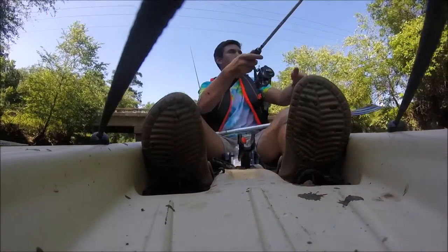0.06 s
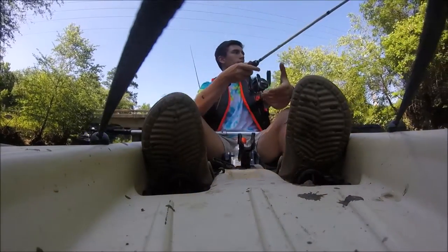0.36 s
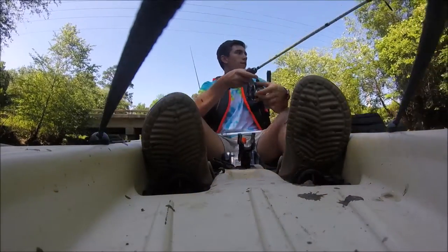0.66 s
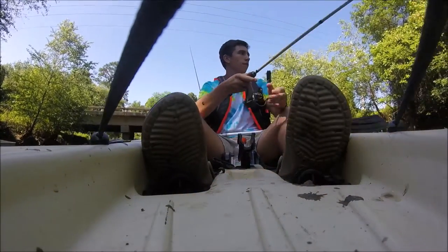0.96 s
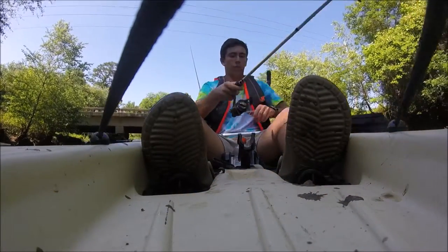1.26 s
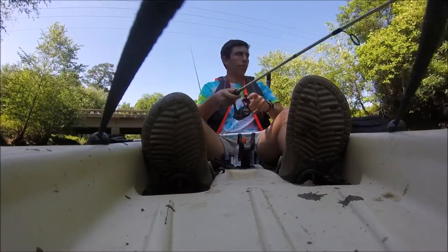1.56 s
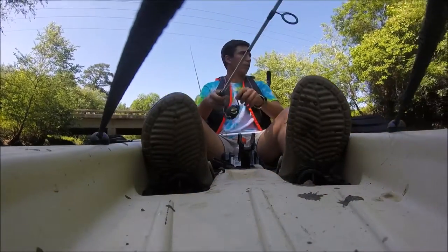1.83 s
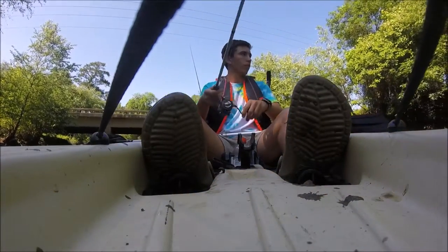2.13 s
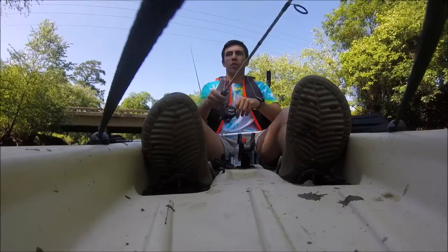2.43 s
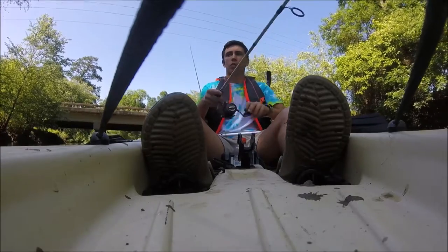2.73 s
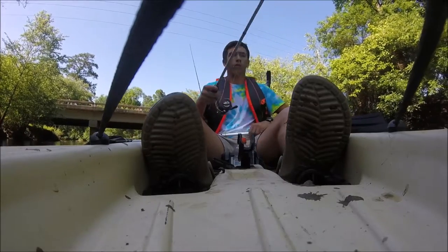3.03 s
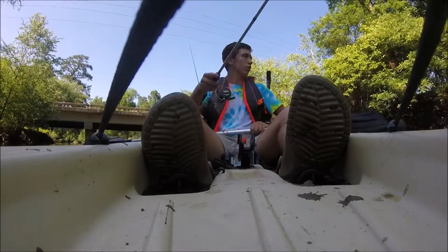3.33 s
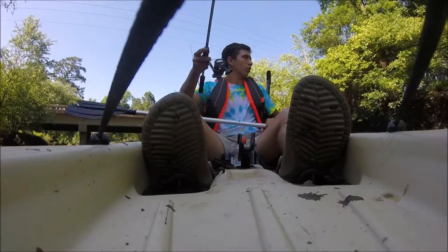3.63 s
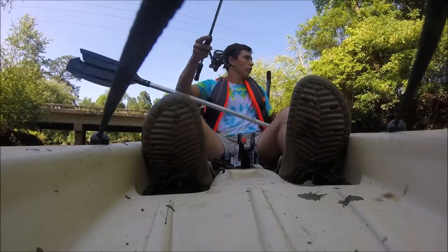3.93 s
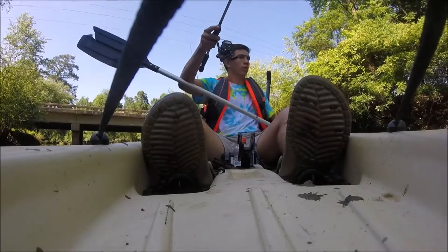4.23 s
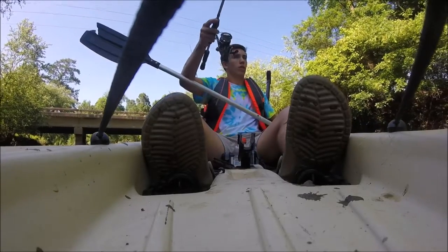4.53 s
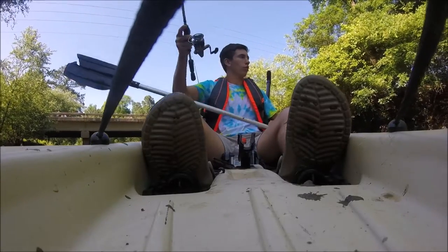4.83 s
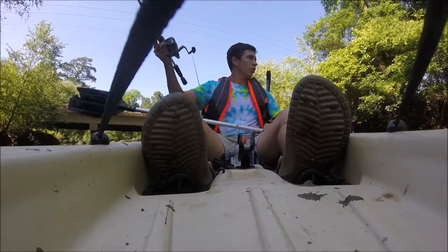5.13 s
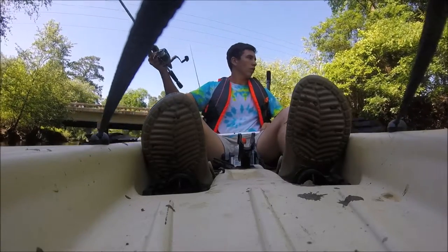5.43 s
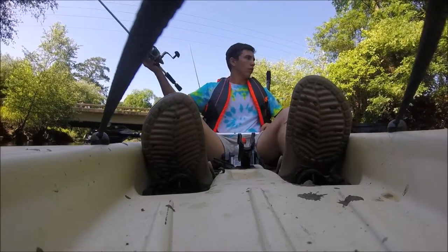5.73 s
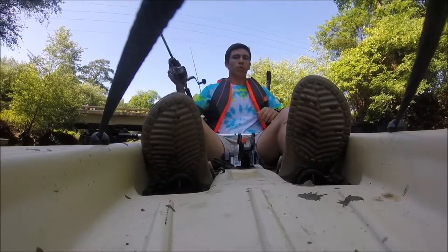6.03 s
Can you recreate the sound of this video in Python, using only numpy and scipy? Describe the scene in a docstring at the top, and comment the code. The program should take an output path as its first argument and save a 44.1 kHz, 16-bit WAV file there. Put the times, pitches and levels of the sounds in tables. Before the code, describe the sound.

A fishing rod and paddle bump a hollow plastic kayak close by, while a reel clicks and distant vehicles softly rumble.

```python
"""Rod butt and paddle knock on the hollow hull of a plastic kayak as an angler shifts about, close by.
Each blow cracks where it lands and sets the hull ringing. The metal parts of his spinning reel click,
and the line hisses as it rubs through the rod rings. A far bird whistles two songs of sliding notes.
Two vehicles rumble over a road bridge behind him, above the soft hiss of creek and leaves."""
import sys
import numpy as np
from scipy import signal
from scipy.fft import rfft, irfft, next_fast_len
from scipy.io import wavfile
from scipy.ndimage import map_coordinates

SR = 44100
rng = np.random.default_rng(int(sys.argv[2]) if len(sys.argv) > 2 else 0)


def log_audio(samples):
    """Write samples as a 16-bit WAV file to the path given in sys.argv[1]."""
    # one column per channel
    frames = np.atleast_2d(samples).T
    # limit to full scale, then quantise
    limited = np.clip(frames, -1, 1)
    pcm = np.round(limited * 32767).astype(np.int16)
    wavfile.write(sys.argv[1], SR, pcm)


N = 272097
TIME = np.arange(N) / SR


def kayak_knocks():
    """Blows on the hull: harder ones add bass and crack, and a stiff spot trades bass for treble."""
    # blows (time [s], level [dB], panel pitch [Hz], damping by what stays pressed on the panel [dB/s])
    blows = [(0.744, -23.5, 610, 20), (1.349, -26, 640, 28), (1.726, -28, 604, 25), (2.073, -35.5, 497, 20),
             (3.017, -42, 555, 18), (3.311, -42, 443, 102), (3.881, -36.5, 476, 1400),
             (3.989, -41.5, 490, 900), (4.074, -13, 529, -2), (4.156, -23.5, 504, 6),
             (5.16, -22.5, 493, 48), (5.259, -32.5, 502, 96), (5.532, -16.5, 631.5, 34),
             (5.589, -30.5, 526, 202), (5.659, -34.5, 623, 58), (5.889, -22, 502, 7),
             (5.968, -26.5, 492, 26), (6.045, -40, 493, 47)]
    firm_db, slack_hz = -25, 527  # an ordinary firm blow; a panel pitched above slack_hz is stiffer
    heave_colour = [(20, -13), (45, -3.5), (70, -13), (130, -16.5), (400, -78)]  # (pitch [Hz], level [dB])
    out, t = np.zeros(N), np.arange(int(.7 * SR)) / SR
    for start, db, panel_hz, damping in blows:
        hull = struck_hull(t, panel_hz) * amp(-abs(damping) * t)
        force_db = db - firm_db
        stiff_db = 15 * np.log2(panel_hz / slack_hz)
        thump_db = -14 + 0.05 * force_db - stiff_db - 0.017 * damping
        crack_db = -31.5 + 0.23 * force_db
        tick_db = -46 + 0.11 * force_db + stiff_db
        parts = [(band(hull, 200, "low"), thump_db), (band(hull, [220, 1200], "band"), -9),
                 (band(hull, [1300, 3200], "band"), crack_db), (band(hull, 3600, "high"), tick_db)]
        add(out, start, sum(amp(db + part_db) * even_start(part) for part, part_db in parts))
        # the boat heaves on the water, heard only after the heaviest blows
        heave = noise(heave_colour, len(t)) * fade(t, 0.61) * (1 - np.exp(-t / 0.013))
        add(out, start, amp(-61.5 + 2.72 * (force_db - stiff_db)) * heave)
    return out


def struck_hull(t, panel_hz):
    """One blow cracks at the contact, sends a bending wave round the hull and leaves it ringing."""
    # the first bending wave and its echoes from the hull's sides (delay [s], level [dB])
    echoes = [(0, 2.5), (.0043, -2), (0.015, -2.5), (0.029, -35)]
    # the hull's ringing tones (pitch [Hz], level [dB], time to fade by 60 dB [s])
    hull_tones = [(47.73, -20, 1), (101.1, -13.5, 0.59), (148.6, -6, 0.26), (177, -10.5, 0.37),
                  (198.8, -10.5, 0.51), (223.8, -10.5, 0.29), (271, -24, 0.34), (320.6, -3.5, 0.1),
                  (376.4, 0, 0.1), (433, -15, 0.23), (476, 1, 0.041), (534.7, -10, 0.44), (612, 9, 0.057),
                  (665, -4.5, 0.095), (751.4, -4.5, 0.16), (922, -17, 0.28), (982, -18, 0.16),
                  (1170, -9.5, 0.072), (1460, -36, 0.021), (1854, 0, 0.073), (1897, -0.5, 0.038),
                  (2770, -1, 0.048)]
    # the crack at the contact (pitch [Hz], level [dB])
    crack_colour = [(900, -12.5), (2000, 6.5), (2800, -4), (3500, -8), (6000, -16), (10000, -37.5),
                    (15000, -43)]
    arrivals = [(np.maximum(t - delay, 0), db) for delay, db in echoes]
    wave = sum(amp(db) * np.sin(2 * np.pi * 470 * age) * fade(age, 0.009) for age, db in arrivals)
    tones = even_start(ring(hull_tones, t, scatter_db=1.5))
    body = (amp(-2) * tones + amp(-5.5) * plastic_shell(t)) * (1 - np.exp(-t / 0.002))
    panel = np.sin(2 * np.pi * panel_hz * t) * fade(t, 0.086) * (1 - np.exp(-t / 0.0088))
    # the contact firms up for a few milliseconds, then lets go
    press = np.exp(-((t - .003) / 0.0021) ** 2)
    release = amp(-1) * fade(t, 0.042) * (1 - np.exp(-t / 0.0013))
    crack = noise(crack_colour, len(t)) * (press + release)
    return body + amp(7.5) * panel + amp(-2.5) * even_start(wave) + crack


def plastic_shell(t):
    """The hull's countless weak tones blur into noise that lasts longest near 150 Hz."""
    # the colour of the weak tones (pitch [Hz], level [dB])
    colour = [(30, -18), (90, -11.5), (200, -3.5), (300, 2.5), (500, 1), (740, 2.5), (1050, -16),
              (2000, -9), (3200, -16.5), (6000, -25.5), (15000, -53)]
    # how long they ring (pitch [Hz], time to fade by 60 dB [s])
    ring_times = [(60, 0.18), (150, 0.57), (300, 0.38), (600, 0.22), (1200, 0.23), (3000, 0.27),
                  (10000, 0.43)]
    hz, age, spectrum = signal.stft(noise(colour, len(t)), SR, nperseg=512)
    fading = spectrum * fade(age, along(ring_times, hz)[:, None])
    return even_start(signal.istft(fading, SR, nperseg=512)[1][:len(t)])


def reel_clicks():
    """Small metal parts snap shut, ping the reel's body and shake the bail, its wire arm."""
    # snaps of bail and reel (time [s], level [dB], boost of the low part [dB], ping pitch [Hz])
    clicks = [(0.9645, -33, -5.5, 2127), (0.9804, -50.5, 2, 2000), (2.269, -54.5, -7, 4260),
              (2.289, -52.5, -6, 4530), (2.8394, -57, 0.5, 2340), (2.9294, -39.5, -20, 3720),
              (3.8796, -51.5, -14, 2100), (6.0703, -52.5, 1.5, 2640)]
    # the bail's ringing tones (pitch [Hz], level [dB], time to fade by 60 dB [s])
    bail_tones = [(1550, -24, 0.45), (2000, -7, 0.24), (3730, -19, 0.073), (4510, 12, 0.057),
                  (4580, -29, 0.19), (5900, -9, .08), (6250, 2, 0.13), (8370, 20, 0.021),
                  (8200, -24, 0.045), (12200, -1, .03)]
    # the colour of a snap (pitch [Hz], level [dB])
    snap_colour = [(1000, -2.5), (2100, -2), (2900, -3), (3600, -3), (5200, -0.5), (7000, -2), (9000, -3.5),
                   (10800, -18.5), (12600, -18), (15000, -22)]
    out, t = np.zeros(N), np.arange(SR // 4) / SR
    winding_ticks = [(start, -61.5, 4, 2170) for start in rng.uniform(1.5, 4.2, size=6)]
    for start, db, low_db, ping_hz in clicks + winding_ticks:
        wire = ring(bail_tones, t, scatter_db=2.5)
        ping = np.sin(2 * np.pi * ping_hz * t) * fade(t, .07)
        snap = noise(snap_colour, len(t)) * (fade(t, 0.018) + amp(-30) * fade(t, 0.14))
        onset = 1 - np.exp(-(t / .002) ** 2)
        click = (even_start(snap) + amp(-12) * even_start(wire) + amp(-10.5) * even_start(ping)) * onset
        add(out, start, amp(db - 15) * even_start(band(click, 2700, "high")))
        add(out, start, amp(db + low_db - 7) * even_start(band(click, 2700, "low")))
        # the harder the snap, the sharper its edge
        edge = band(snap * fade(t, .025) * onset, 11000, "high")
        add(out, start, amp(2.2 * db + 9) * even_start(edge))
    return out


def fishing_line():
    """Line rubs through the rings: a hiss roughened by tiny slips, fluttering as the coils pass."""
    # short runs of line (start [s], length [s], level [dB])
    runs = [(-.15, 0.41, -63.5), (0.188, 0.53, -82), (2.258, 0.18, -68), (2.426, 0.29, -68.5),
            (5.147, 0.24, -71.5)]
    # the colour of the rubbing (pitch [Hz], level [dB])
    colour = [(3000, -27), (4500, -10), (6000, 8), (7400, -5), (8800, -3), (10500, -8), (12500, -6),
              (15000, -14)]
    running = sum(amp(db) * np.sin(np.pi * np.clip((TIME - start) / length, 0, 1))
                  for start, length, db in runs)
    slips, t = np.zeros(N), TIME[:SR // 40]
    for start, hz, size in rng.uniform([0, 4500, 0], [N / SR, 13500, 1], (6000, 3)):
        slip = np.sin(2 * np.pi * hz * t) * fade(t, .012)
        add(slips, start, size ** 2 * amp(along(colour, hz)) * slip)
    coils = amp(3 * wobble(130))
    return amp(-4.5) * running * unit(coils * (noise(colour, N) + unit(slips)))


def bird():
    """Each phrase is a low rising note, then a high one sliding down; the trees scatter their echoes."""
    # the rising note in even steps (pitch [share of the top pitch], level [dB])
    rising = [(.475, -6), (.505, 0), (.53, -1), (.56, -5)]
    # the falling note in even steps (pitch [share of the top pitch], level [dB])
    falling = [(.97, -10), (1, 1), (.96, 0), (.88, -3), (.82, -5), (.75, -3), (.69, -5)]
    out, t = np.zeros(N), np.arange(SR // 2) / SR
    for start, db in bird_phrases(count=7):
        top_hz = 3900 * (1 + 0.0121 * rng.standard_normal())
        low_note = amp(2) * whistle(.055, rising, top_hz)
        high_note = whistle(.082, falling, top_hz)
        for when, note in [(start - .072, low_note), (start, high_note)]:
            trees = rng.standard_normal(len(t)) * (fade(t, .05) + amp(-14) * fade(t, .7))
            add(out, when, amp(db - 3) * note)
            add(out, when, amp(db - 6) * signal.fftconvolve(note, trees / np.linalg.norm(trees)))
    return out * amp(2.5 * wobble(70))


def bird_phrases(count):
    """List each phrase (time [s], level [dB]): a song quickens as it swells and falls away."""
    # the two songs, the first already under way (start [s])
    song_starts = [-.738, 4.348]
    # the top of each song's swell (level [dB])
    song_levels = [-66.5, -64]
    loudest_after_s, swell_db_per_s = .93, 8.5
    gaps_s = .2445 - .005 * np.arange(count - 1)
    offsets = np.append(0, np.cumsum(gaps_s))
    return [(start + offset, db - swell_db_per_s * abs(offset - loudest_after_s))
            for start, db in zip(song_starts, song_levels) for offset in offsets]


def whistle(length_s, steps, top_hz):
    """One pure note slides through evenly spaced steps of pitch and level."""
    progress = np.linspace(0, 1, int(length_s * SR))
    share, db = [np.interp(progress, np.linspace(0, 1, len(col)), col) for col in np.transpose(steps)]
    tone = unit(np.sin(2 * np.pi * np.cumsum(top_hz * share) / SR))
    return amp(db) * tone * signal.windows.tukey(len(tone), 1 / 8)


def traffic_and_creek():
    """Exhausts rumble and tyres roar, hiss and whine over steady far traffic, creek and leaves."""
    # vehicles on the bridge (time when nearest [s], rumble [dB], tyre roar [dB], tyre whine [dB])
    vehicles = [(.42, -47, -48.5, -77), (5.75, -54.5, -64.5, -57.5)]
    # the colour of the exhaust rumble (pitch [Hz], level [dB])
    rumble_colour = [(15, -16), (25, -2.5), (38, -4), (52, -3), (70, 2), (100, -6), (150, -8), (220, -13.5),
                     (320, -21), (600, -68)]
    # the colour of tyres on the road (pitch [Hz], level [dB])
    road_colour = [(120, 3), (220, -3.5), (350, 1), (480, 2.5), (650, -1), (800, -8), (1050, -18.5),
                   (1500, -25.5), (2100, -17), (3000, -33), (6000, -54)]
    # the colour of the hiss of creek, leaves and tyres (pitch [Hz], level [dB])
    hiss_colour = [(400, -3), (900, 7.5), (1500, 3.5), (2050, 3), (2700, -1.5), (4000, -4), (6000, -10),
                   (9000, -16), (12000, -21.5), (15000, -31.5)]
    far_rumble_db, far_road_db, creek_db = -56, -59.5, -65.5
    exhaust_lag_s = 0.35  # the exhaust points backwards, so it is loudest after the vehicle has passed
    nearest_s, rumble_db, roar_db, whine_db = np.transpose(vehicles)[:, :, None]
    roar = passing(nearest_s, roar_db, half_power_s=.55)
    exhaust = passing(nearest_s + exhaust_lag_s, rumble_db, half_power_s=1.05)  # rumble carries farther
    flutter = amp(1.3 * wobble(22))
    rumble = np.hypot(amp(far_rumble_db), exhaust) * noise(rumble_colour, N)
    road = np.hypot(amp(far_road_db), roar) * flutter * noise(road_colour, N)
    hiss = np.hypot(amp(creek_db), amp(-18) * roar) * amp(0.16 * wobble(10)) * noise(hiss_colour, N)
    tyre_tone = np.sin(2 * np.pi * np.cumsum(568 + 8 * wobble(40)) / SR)
    whine = passing(nearest_s, whine_db, half_power_s=.55) * amp(2.5 * wobble(25)) * tyre_tone
    return rumble + road + hiss + whine


def passing(nearest_s, db, half_power_s):
    """The joint gain of vehicles going by, each quieter the farther away it is."""
    return np.sqrt(np.sum(amp(db) ** 2 / (1 + ((TIME - nearest_s) / half_power_s) ** 2), 0))


def ring(tones, t, scatter_db):
    """Fading tones of a struck thing; random strength and sign stand for where the blow lands."""
    hz, db, t60 = np.transpose(tones)[:, :, None]
    size = rng.choice([-1, 1], hz.shape) * amp(db + scatter_db * rng.standard_normal(hz.shape))
    return np.sum(size * fade(t, t60) * np.sin(2 * np.pi * hz * t), 0)


def noise(colour, size):
    """Noise of average strength 1, shaped by points (pitch [Hz], level [dB])."""
    padded = next_fast_len(size)
    gain = amp(along(colour, np.fft.rfftfreq(padded, 1 / SR)))
    return unit(irfft(rfft(rng.standard_normal(padded)) * gain, padded)[:size])


def band(x, edge_hz, kind):
    """Keep the low, high or middle pitches of a sound, without delay, and ease in its start."""
    sections, lead = signal.butter(2, edge_hz, kind, fs=SR, output="sos"), SR // 20
    ease_in = 1 - np.exp(-(np.arange(len(x)) / SR * np.max(edge_hz) * 2) ** 2)
    return signal.sosfiltfilt(sections, np.pad(x, (lead, 0)))[lead:] * ease_in


def wobble(rate):
    """A smooth curve through `rate` random values a second."""
    return map_coordinates(rng.standard_normal(int(N * rate / SR) + 4), [TIME * rate])


def along(points, hz):
    """Read between points (pitch [Hz], value), with octaves evenly spaced."""
    pitches, values = np.transpose(points)
    return np.interp(np.log(hz + 1), np.log(pitches + 1), values)


def fade(t, t60):
    """Die away by 60 dB every t60 seconds."""
    return np.exp(-np.log(1000) * t / t60)


def amp(db):
    """Turn decibels into a gain."""
    return 10 ** (np.asarray(db) / 20)


def unit(x):
    """Scale a sound to an average strength (rms) of 1."""
    return x / np.sqrt(np.mean(x ** 2) + 1e-20)


def even_start(x):
    """Scale a blow so that its first 25 ms have an average strength of 1."""
    return x / (np.sqrt(np.mean(x[:SR // 40] ** 2)) + 1e-12)


def add(track, start_s, sound):
    """Mix a sound into the track at the given time."""
    start = round(start_s * SR)
    part = sound[max(-start, 0):max(N - start, 0)]
    track[max(start, 0):][:len(part)] += part


def scene():
    """All the sources together, in one channel."""
    return (kayak_knocks() + reel_clicks() + fishing_line() + bird() + traffic_and_creek())[None]


def record(dry):
    """The very highest treble is cut away."""
    top_hz, slope_width_hz = 15300, 400
    padded = next_fast_len(N + SR // 2)
    gain = np.clip((top_hz - np.fft.rfftfreq(padded, 1 / SR)) / slope_width_hz + .5, 0, 1)
    return irfft(rfft(dry, padded) * gain, padded)[..., :N]


dry = scene()
out = record(dry)
log_audio(out)
```